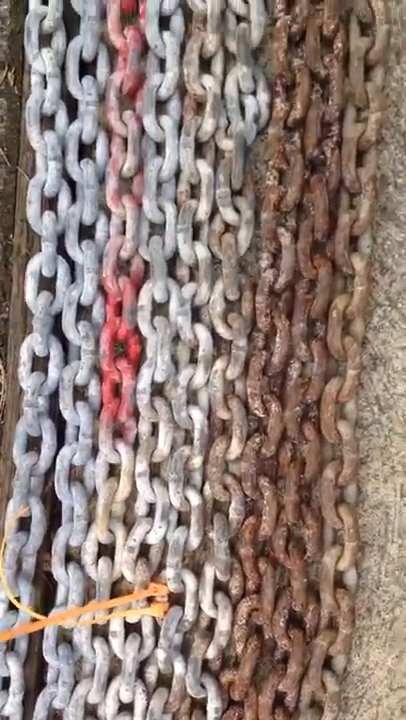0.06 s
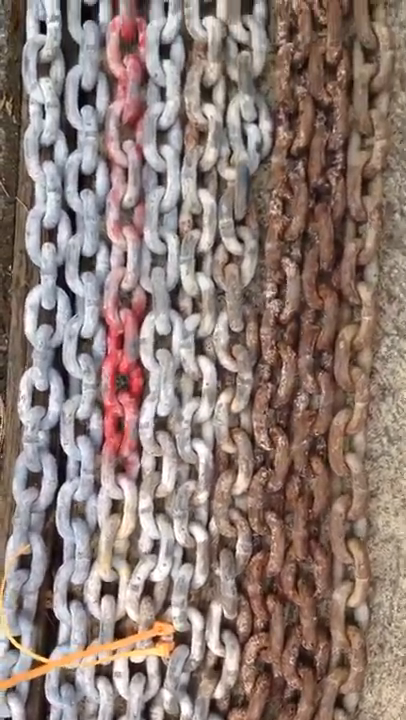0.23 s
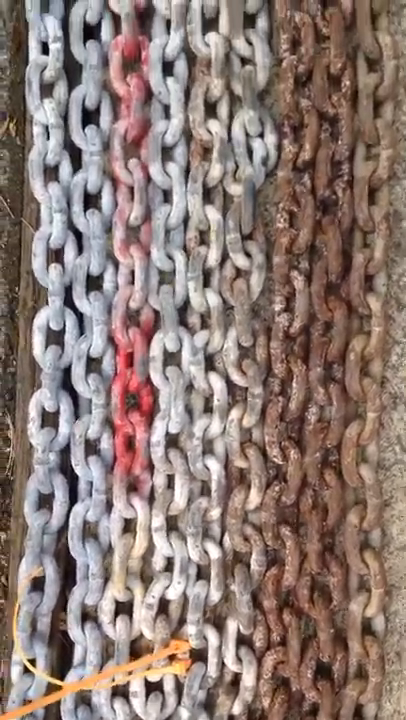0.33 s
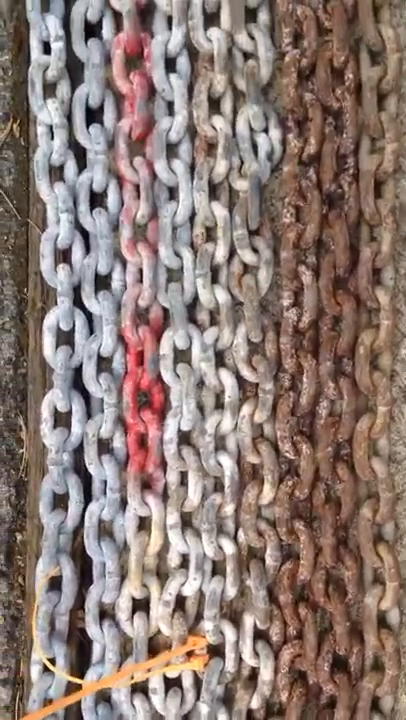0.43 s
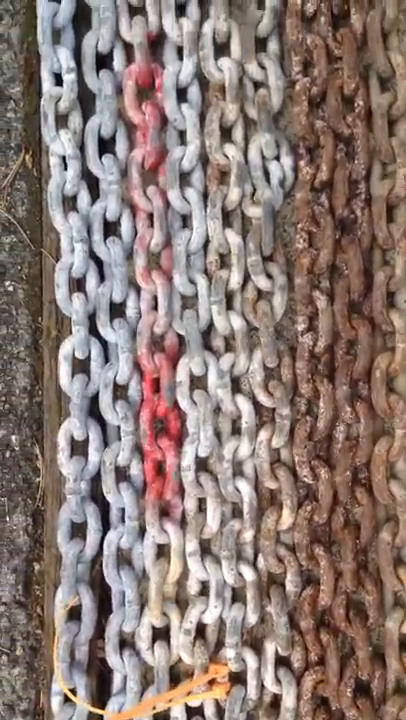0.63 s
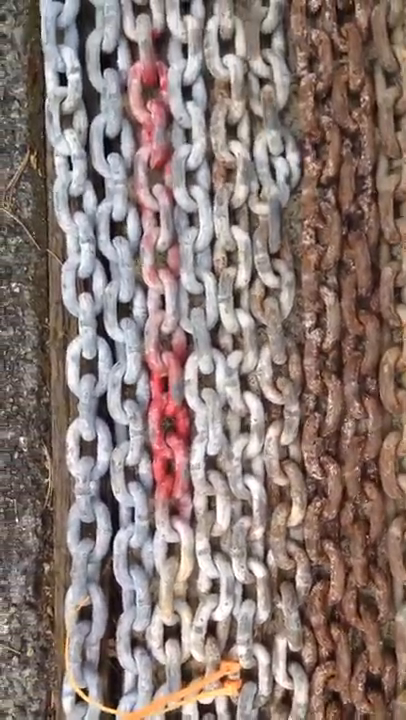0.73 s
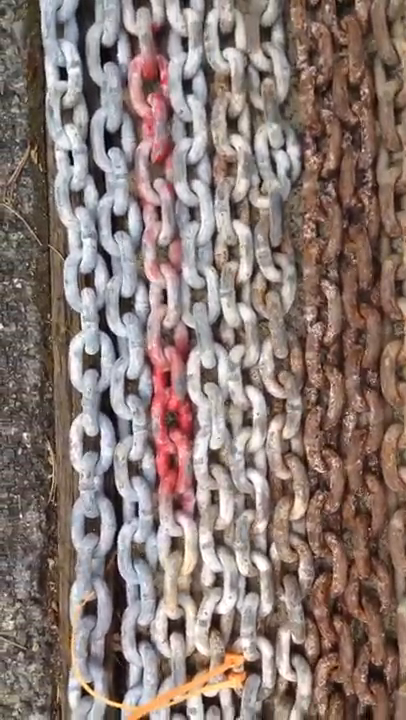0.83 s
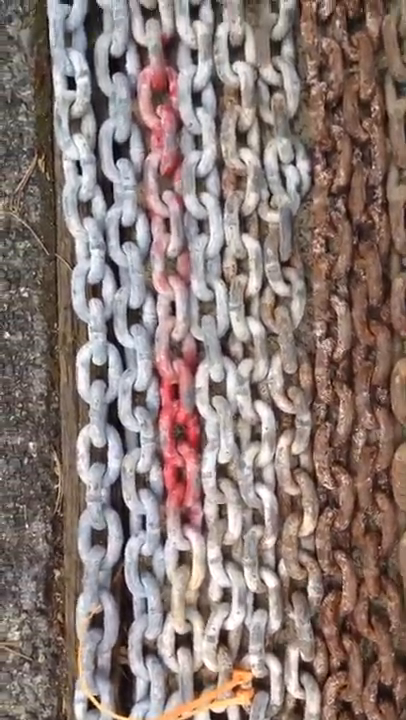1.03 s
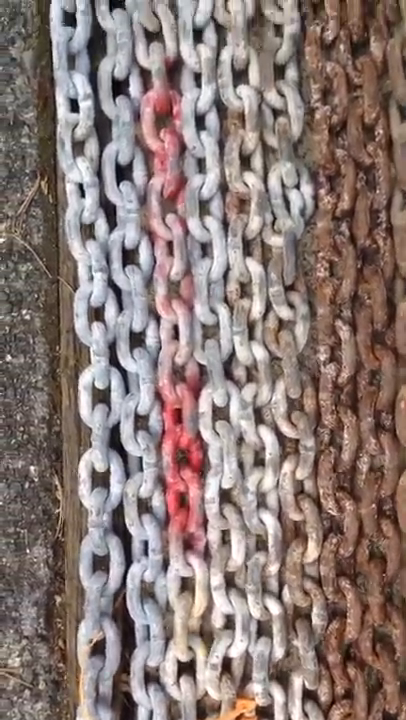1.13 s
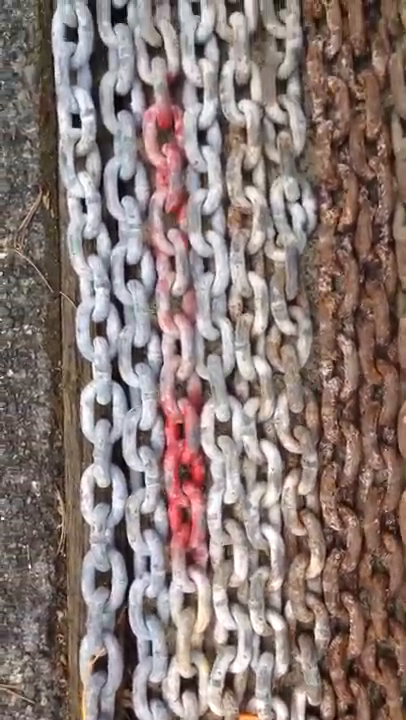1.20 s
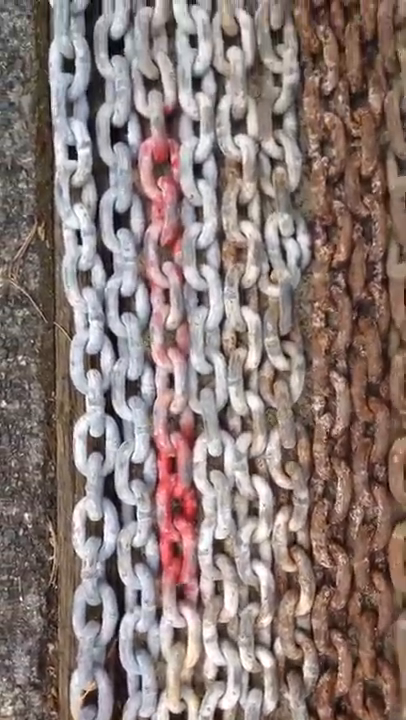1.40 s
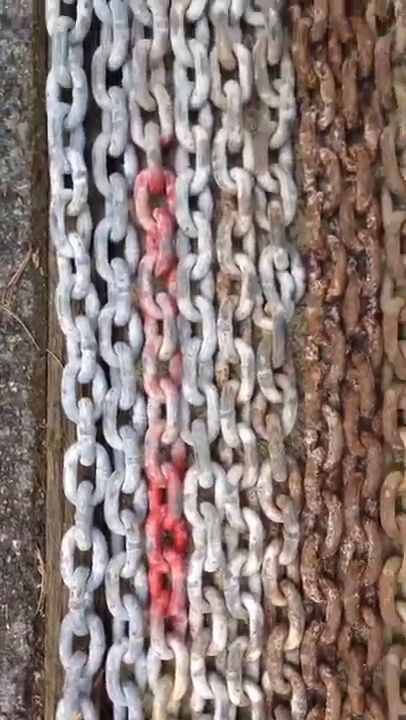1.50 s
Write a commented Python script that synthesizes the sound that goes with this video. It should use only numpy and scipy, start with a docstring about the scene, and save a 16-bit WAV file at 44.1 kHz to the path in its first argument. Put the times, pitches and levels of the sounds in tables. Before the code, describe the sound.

Close handling noise: a hollow case knocks, clicks and rubs against faint outdoor hiss.

```python
"""A hand-held case is handled close to the microphone, outdoors, over quiet hiss, low rumble and hum.
The grip shifts: fingers rub, and the case creaks and knocks in a quick cluster of slips that ring its
hollow body. Sparse ticks follow and gather into a thinner run of dry clicks just before one second.
A few faint ticks close the scene, with soft finger rubs in between."""
import sys
import numpy as np
from scipy import signal
from scipy.fft import rfft, irfft
from scipy.io import wavfile
from scipy.ndimage import uniform_filter1d

SR = 44100
rng = np.random.default_rng(int(sys.argv[2]) if len(sys.argv) > 2 else 0)


def file_out(sig):
    """Save sig as 16-bit WAV at sys.argv[1]."""
    # one column per channel
    cols = np.atleast_2d(sig).T
    # limit, then scale
    lim = np.clip(cols, -1, 1)
    pcm = np.round(lim * 32767).astype(np.int16)
    wavfile.write(sys.argv[1], SR, pcm)


N = 68355
TIME = np.arange(N) / SR


def from_db(db):
    """Decibels to gain."""
    return 10 ** (np.asarray(db) / 20)


def unit_energy(x):
    """Scale to a total energy of one."""
    return x / np.sqrt(np.sum(x ** 2) + 1e-20)


def add(track, start_s, sound):
    """Mix a sound into a track at its start time."""
    start = int(start_s * SR)
    track[start:start + len(sound)] += sound[:N - start]


def coloured(x, curve, size=4096):
    """Minimum-phase EQ through (frequency_hz, gain_db) points; white noise keeps its level."""
    hz, db = np.transpose(curve)
    grid_hz = np.maximum(np.arange(size // 2 + 1) * SR / size, 1)
    gain = from_db(np.interp(np.log(grid_hz), np.log(hz), db))
    cepstrum = irfft(np.log(gain))
    cepstrum[1:size // 2] *= 2   # folded forward, so nothing rings ahead of an attack
    cepstrum[size // 2 + 1:] = 0
    impulse = irfft(np.exp(rfft(cepstrum)))
    return signal.fftconvolve(x, unit_energy(impulse))[:N]


def tilted(x, treble_db, centre_hz=7900):
    """Tilt the treble up or down across two octaves."""
    return coloured(x, [(centre_hz / 2, 0), (centre_hz * 2, treble_db)])


def background(air_db=-62.5, hum_hz=60.4, hum_db=-79.5):
    """A steady bed of hiss and far rumble, with a faint hum."""
    # spectrum of the outdoor air: frequency_hz, gain_db
    air_eq = [(30, -37), (48, -27), (85, -13), (115, 0), (170, 0.5), (300, -4.5), (450, -10), (800, -12.5),
              (1500, -17), (2500, -16), (3400, -23), (5000, -24.5), (7500, -21.5), (10000, -26),
              (15000, -26)]
    air = from_db(air_db) * coloured(rng.standard_normal(N), air_eq)
    hum = from_db(hum_db) * np.sqrt(2) * np.sin(2 * np.pi * hum_hz * TIME)
    return air + hum


def finger_rubs(rise_share=0.24, grain_db=3, grain_samples=40):
    """Fingers slide on the case: grainy friction swells quickly and fades with each stroke's pressure."""
    # finger strokes: start_s, length_s, level_db, treble_db
    strokes = [(0.209, .035, -43, 3), (0.235, 0.047, -51, -3), (0.262, .016, -47, 0),
               (0.27, 0.18, -64, 2.5), (0.665, 0.052, -64.5, -8), (0.742, 0.16, -70, -2),
               (0.854, 0.11, -60, 4.5), (0.93, .11, -64, -5.5), (1.261, 0.028, -54, 1.5),
               (1.288, 0.064, -64.5, -3.5), (1.33, 0.085, -64, -2)]
    # tone of skin on the case: frequency_hz, gain_db
    rub_eq = [(150, -6.5), (600, -2), (1300, -2.5), (2400, 0), (4000, -7.5), (5300, -6), (6400, 0.5),
              (8000, -0.5), (9200, -4.5), (12500, -3.5), (15000, -12)]
    friction, t = np.zeros(N), TIME[:N // 4]
    for start_s, length_s, level_db, treble_db in strokes:
        pressure = np.interp(t / length_s, [0, rise_share, 1], [0, 1, 0])
        noise, roughness = rng.standard_normal((2, len(t)))
        roughness = uniform_filter1d(roughness, grain_samples) * np.sqrt(grain_samples)
        stroke = noise * from_db(grain_db * roughness) * pressure
        add(friction, start_s, from_db(level_db) * tilted(stroke, treble_db))
    return coloured(friction, rub_eq)


def contact(length_s, fade_share=0.465, size=2048):
    """A brief gritty slip that holds for half its length, then fades; energy one."""
    envelope = np.exp(-np.maximum(TIME[:size] / length_s - .5, 0) / fade_share)
    burst = rng.standard_normal(size) * envelope
    for _ in range(4):   # even out the spectrum while keeping the burst short
        spectrum = rfft(burst)
        burst = irfft(spectrum / (np.abs(spectrum) + 1e-12)) * np.sqrt(envelope)
    return unit_energy(burst)


def mode(pitch_hz, t60_s):
    """One resonance: a dying sine."""
    t = TIME[:6000]
    return from_db(-60 * t / t60_s) * np.sin(2 * np.pi * pitch_hz * t)


def case_knocks():
    """The grip shifts: each slip gives a bright crack and sets the hollow case ringing."""
    # slips of the case: start_s, crack_db, length_s, body_db
    slips = [(0.2096, -27, 0.0028, -17), (0.2125, -22, 0.0031, -28), (0.2160, -29, 0.0026, -34),
             (0.2194, -18.5, .002, -21.5), (0.2235, -18, 0.0032, -27), (0.2271, -8.5, .001, -14),
             (0.2286, -13, 0.0022, -18), (0.2314, -17, .0012, -15), (0.2329, -.5, 0.00173, -17),
             (0.2349, -13, .0015, -31.5), (0.2392, -28, 0.0018, -29), (0.2433, -35, 0.0058, -24.5),
             (0.257, -32, 0.0024, -35), (0.2603, -28.5, 0.0014, -30), (0.2648, -28, .003, -28.5),
             (0.2681, -25.5, 0.0028, -36)]
    # tone of the cracks: frequency_hz, gain_db
    crack_eq = [(60, -42), (200, -20.5), (450, -14), (1200, -23.5), (2200, -14.5), (3200, -5.5),
                (4200, -11.5), (5300, -14), (6200, -1.5), (8200, 1), (8800, -9.5), (10600, -15),
                (13000, -4.5), (15000, -14.5)]
    # resonances of the hollow case: pitch_hz, level_db, t60_s
    case_modes = [(204, -14.5, 0.087), (324, -2, 0.028), (432, 2.5, 0.037), (500, -1.5, 0.032),
                  (636.5, -3.5, 0.043), (927, -7.5, 0.037), (1392, -14.5, .02), (2225, -6, 0.029),
                  (2494, -0.5, 0.058), (2940, 0, 0.017)]
    body = sum(from_db(level_db) * mode(pitch_hz, t60_s) * (-1) ** k   # alternating polarity
               for k, (pitch_hz, level_db, t60_s) in enumerate(case_modes))
    cracks, rings = np.zeros((2, N))
    for start_s, crack_db, length_s, body_db in slips:
        slip = contact(length_s)
        ring = unit_energy(signal.fftconvolve(slip, body))
        add(cracks, start_s, from_db(crack_db) * slip)
        add(rings, start_s, from_db(body_db) * ring)
    return coloured(cracks, crack_eq) + rings


def dry_clicks(ping_db=-6.5, ping_t60_s=0.013):
    """Light contacts that hardly move the body: a thin snap and a very short ping."""
    # light contacts on the case: start_s, level_db, length_s, treble_db, pitch_hz
    touches = [(0.4466, -38.5, .0015, -6, 2900), (0.5990, -42.5, 0.00093, -4, 6300),
               (0.7105, -45, .001, 1, 7750), (0.828, -38.5, 0.0022, 2, 6500), (0.841, -42, .002, -3, 6060),
               (0.861, -31.5, 0.0021, 4, 3230), (0.8683, -29.5, 0.0018, 8, 6400),
               (0.9136, -32, .0015, -6, 5600), (0.9180, -29, .001, -1, 7200),
               (0.9197, -28, 0.0012, 1, 5550), (0.9228, -21, 0.001, -2.5, 7750),
               (0.9290, -18.5, 0.00077, 6.5, 11500), (0.9297, -12.5, .0011, 0.5, 5100),
               (0.9314, -24, 0.0011, -6, 6800), (0.939, -33, .0015, -1, 7400), (1.0558, -44, .001, 0, 8200),
               (1.1037, -43.5, .001, 4, 7000), (1.2656, -34.5, .003, 0, 6300),
               (1.3796, -35.5, 0.0019, -6, 2050)]
    # tone of the snaps: frequency_hz, gain_db
    snap_eq = [(150, -28.5), (800, -6.5), (1500, -11), (2400, -21.5), (3500, -5.5), (4200, -11.5),
               (5100, -0.5), (6200, -3), (8000, 3), (9000, -10.5), (10000, -6), (12000, -2.5), (15000, -15)]
    snaps, pings = np.zeros((2, N))
    for start_s, level_db, length_s, treble_db, pitch_hz in touches:
        slip = contact(length_s)
        ping = unit_energy(signal.fftconvolve(slip, mode(pitch_hz, ping_t60_s)))
        add(snaps, start_s, from_db(level_db) * tilted(slip, treble_db))
        add(pings, start_s, from_db(level_db + ping_db) * ping)
    return coloured(snaps, snap_eq) + pings


def ring_out(x, level_db, t60_s):
    """Dense, evenly dying reverberation, wet only, at a level relative to the sound."""
    decay = rng.standard_normal(N) * from_db(-60 * TIME / t60_s)
    return from_db(level_db) * signal.fftconvolve(x, unit_energy(decay))[:N]


def scene():
    """Mono mix: close knocks and clicks with a faint tail, finger rubs and the outdoor bed."""
    hits = case_knocks() + dry_clicks()
    hits = hits + ring_out(hits, level_db=-20.5, t60_s=0.056)   # the case's brief after-ring
    tail = ring_out(hits, level_db=-24, t60_s=0.45)
    return (hits + tail + finger_rubs() + background())[None]


def record(dry):
    """A steep low-pass takes off the very top."""
    cutoff_hz = 15250
    return signal.sosfilt(signal.ellip(10, .2, 70, cutoff_hz, fs=SR, output="sos"), dry)


dry = scene()
out = record(dry)
file_out(out)
```